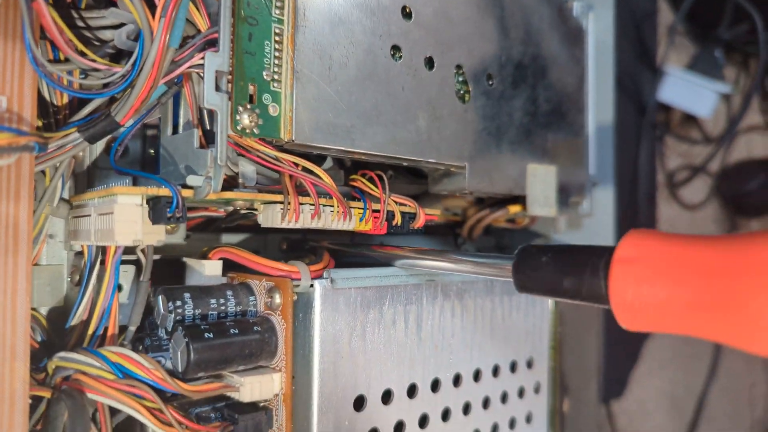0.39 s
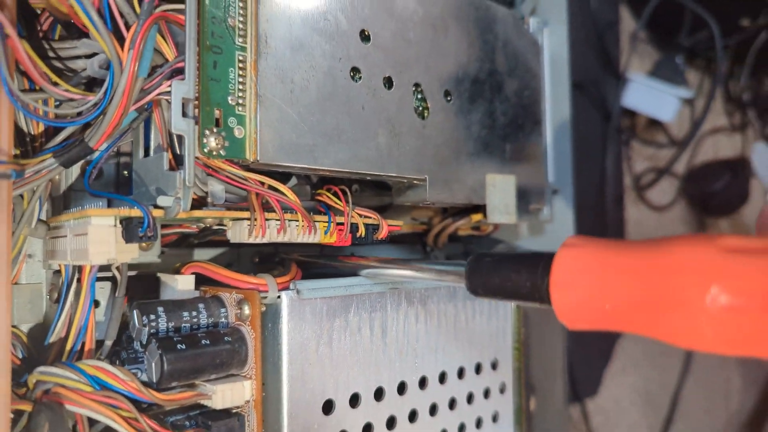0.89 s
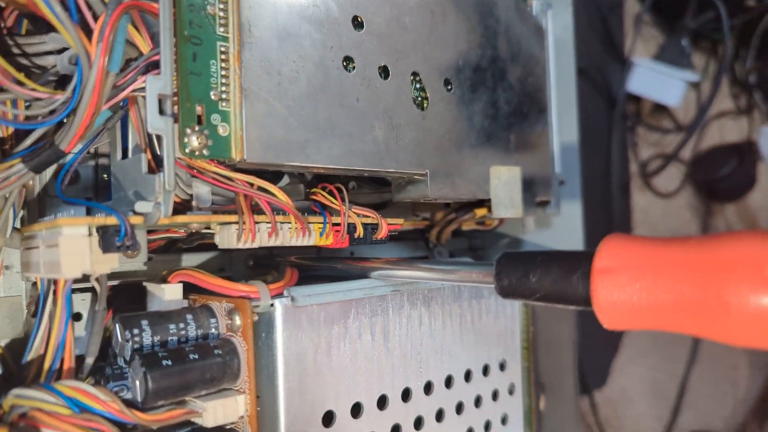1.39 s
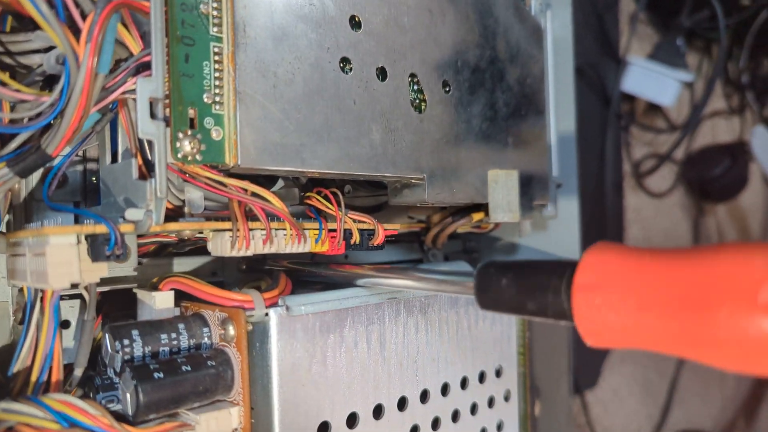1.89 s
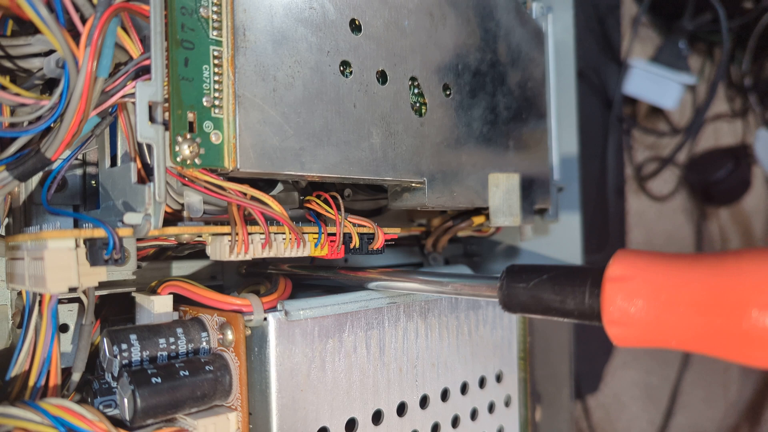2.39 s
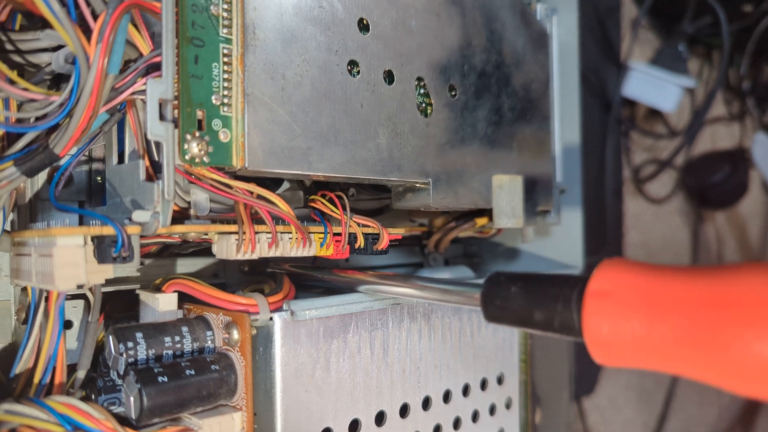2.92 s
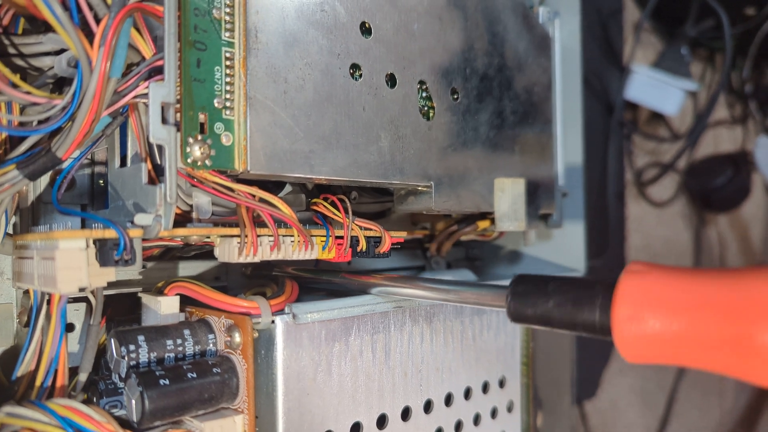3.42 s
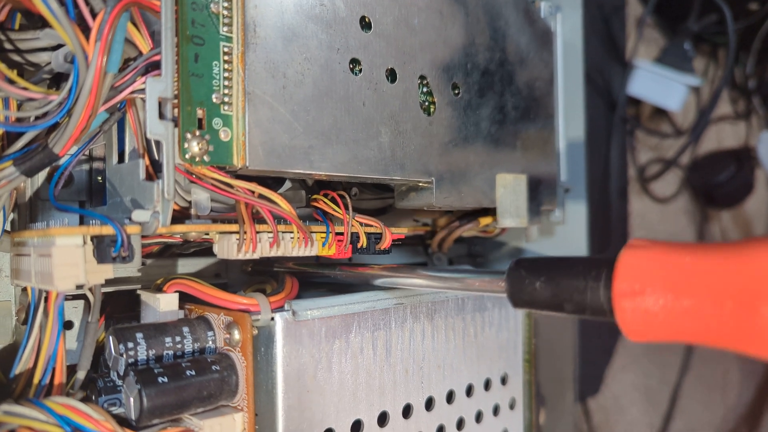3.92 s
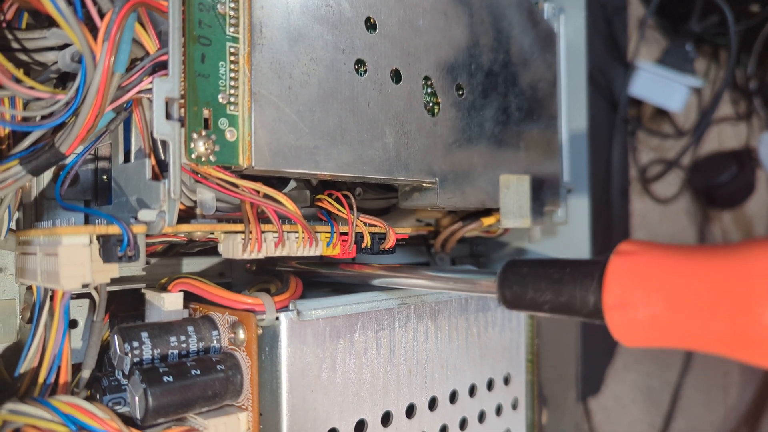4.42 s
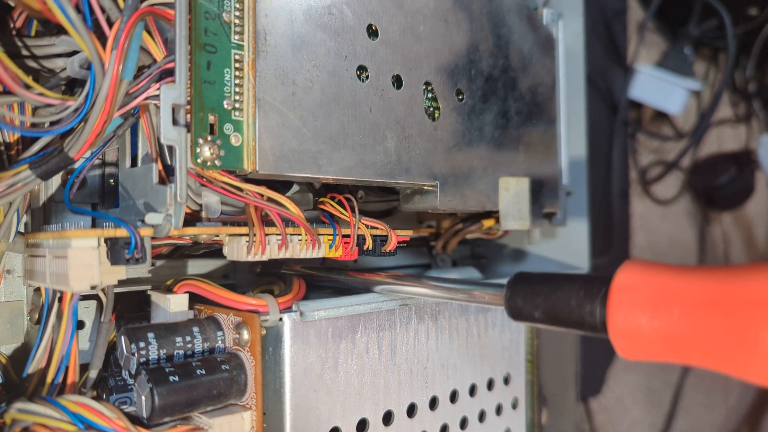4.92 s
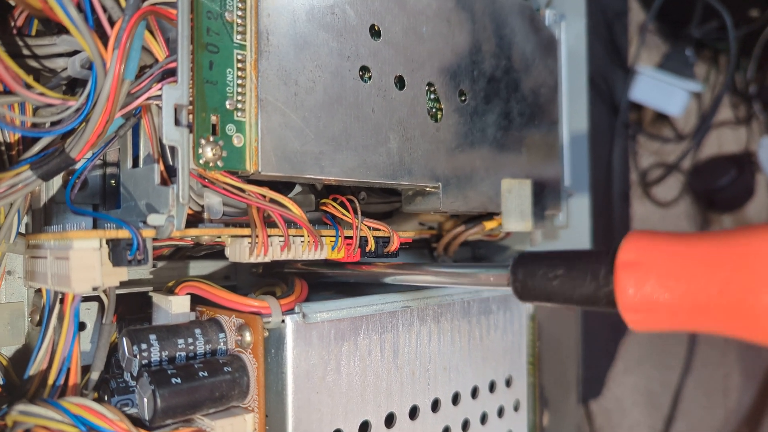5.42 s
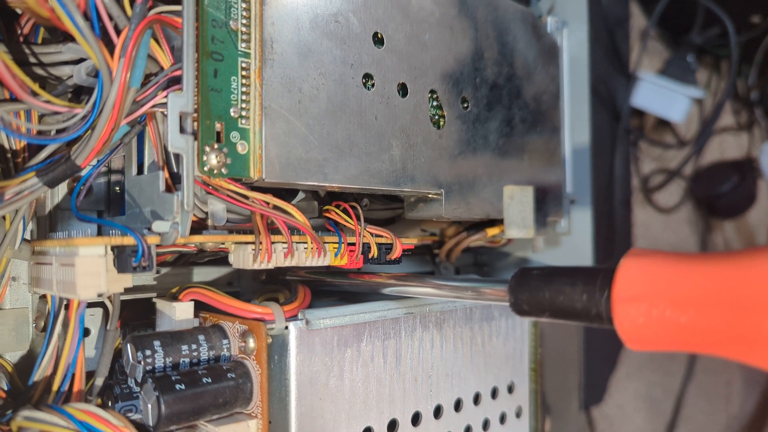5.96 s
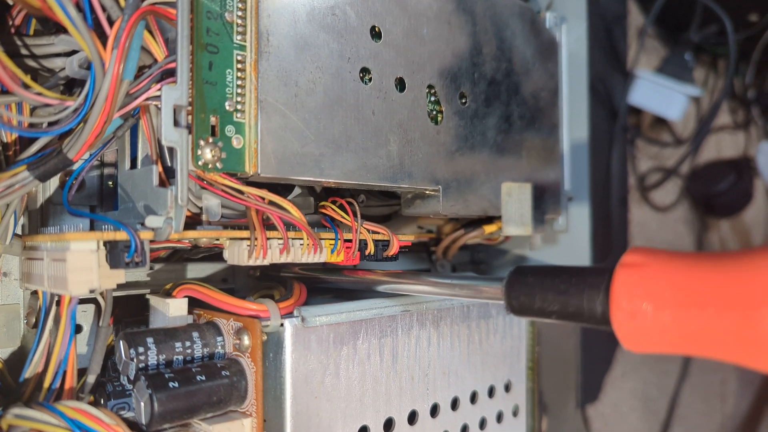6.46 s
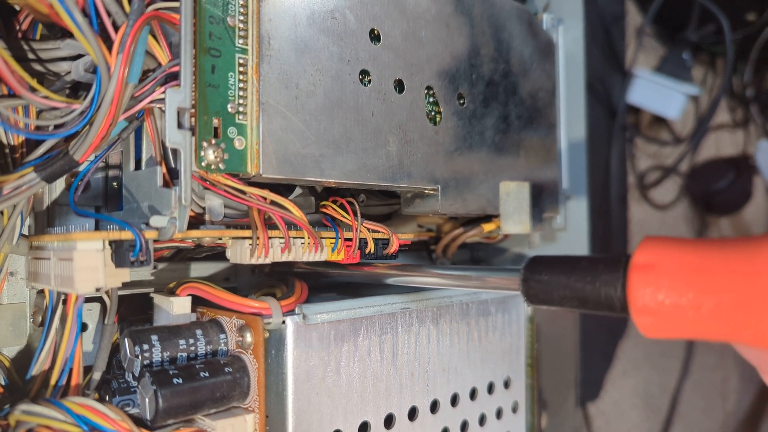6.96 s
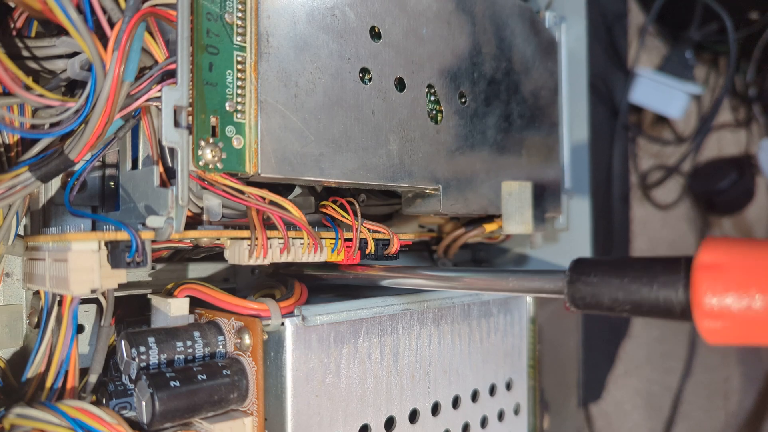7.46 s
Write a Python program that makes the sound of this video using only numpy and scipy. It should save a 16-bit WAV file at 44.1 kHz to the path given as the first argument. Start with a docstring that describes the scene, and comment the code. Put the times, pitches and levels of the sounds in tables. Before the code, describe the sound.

Sharp metallic clicks and fainter ticks ring irregularly from a thin metal chassis as a screwdriver works a screw in a quiet room.

```python
"""Ticks, sharp or faint, ring a sheet-metal chassis as a screwdriver turns out a screw in a quiet room.
The tip slips and seats in the screw head: each contact excites damped plate modes and a blurred noise tail.
Dull handle knocks and higher, short body rings under some ticks share one set of modes; soft thumps are
the chassis rocking on the bench. Near the end the shaft scrapes: stick-slip noise drives its resonances.
Filtered noises form the sliding fingers, the hand movement and the room rumble with microphone hiss."""
import sys
import numpy as np
from scipy import signal
from scipy.fft import rfft, irfft, next_fast_len
from scipy.io import wavfile
from scipy.ndimage import uniform_filter1d

SR = 44100
rng = np.random.default_rng(int(sys.argv[2]) if len(sys.argv) > 2 else 0)


def wav_record(signal):
    """Record a signal, one row per channel, as 16-bit PCM in the file named by sys.argv[1]."""
    frames = np.transpose(np.atleast_2d(signal))
    bounded = np.clip(frames, -1, 1)
    # unit amplitude maps onto the largest positive 16-bit level
    quanta = np.round(bounded * 32767).astype(np.int16)
    wavfile.write(sys.argv[1], SR, quanta)


def volts_from_decibels(level):
    """Turn decibel levels (scalar or array-like) into linear amplitude factors."""
    exponent = np.asarray(level, float) / 20
    return 10 ** exponent


N = 334719


def evened(x):
    """Normalises power: scales to rms 1."""
    return x / np.sqrt(np.mean(x ** 2) + 1e-20)


def read(points, hz):
    """Interpolates a table along log frequency, as pitch is heard."""
    f, value = np.transpose(points)
    return np.interp(np.log(hz + 1), np.log(f + 1), value)


def add(mix, s, sound):
    """Superposes a sound on the mix from a time in seconds."""
    part = mix[round(s * SR):][:len(sound)]
    part += sound[:len(part)]


def coloured(x, spectrum):
    """Linear filtering: weights the spectrum of x by a (frequency, dB) table, then sets rms 1."""
    size = next_fast_len(len(x))
    gain = volts_from_decibels(read(spectrum, np.fft.rfftfreq(size, 1 / SR)))
    return evened(irfft(rfft(x, size) * gain, size)[:len(x)])


def lumpy(rate_hz, depth_db):
    """Random amplitude modulation: a gain from rate_hz random points a second, depth_db rms."""
    points = rng.standard_normal(int(rate_hz * N / SR))
    return volts_from_decibels(depth_db * evened(signal.resample(points, N)))


def ticks():
    """Superposition of contacts: sharp metallic blows, faint dull nudges and soft rustly touches."""
    # ticks of the tip, from sharp metallic blows to faint dull nudges and soft rustly contacts:
    # (time [s], peak of the middle ring before its rise [dB], treble rings above that peak [dB],
    # bass rings above it [dB], tilt of the middle [dB per octave])
    contacts = [(0.124, -56.5, -31, -6, -2), (0.207, -57, -21.5, 2.5, -8), (0.2805, -31.5, -24, -24, 3),
                (0.3683, -32, -27.5, -24.5, 1), (0.4278, -37, -24, -23, 0), (0.635, -14, -22, -24.5, 2),
                (0.8429, -33, -26, -23, 0), (0.925, -54, -16.5, -1, 4), (0.9996, -18, -22, -28, 1.5),
                (1.1442, -48.5, -26, -15, 23), (1.157, -44.5, -34, -8.5, -22), (1.168, -51, -38, -4, -12),
                (1.3811, -24.5, -33, -22.5, 0), (1.6001, -12, -28.5, -21, 22.5),
                (1.775, -23.5, -27, -26, 3), (1.8522, -54, -22, -1, 2), (1.8993, -31.5, -23, -25, 4),
                (2.0139, -54.5, -46, -5, -15), (2.0735, -22.5, -22, -25, 1),
                (2.1903, -40.5, -16.5, -9.5, 35), (2.395, -54, -28, 1, -7), (2.5253, -34, -29.5, -18.5, 7),
                (2.5713, -38, -25.5, -13, -9), (2.8939, -36.5, -26.5, -24, -4),
                (3.1722, -11, -21, -27.5, 1.5), (3.2363, -43.5, -27, -6, -10), (3.3313, -56, -18, -7, -2),
                (3.3628, -55.5, -27, -8, -7), (3.418, -49, -29, -33, -5), (3.472, -13.5, -20, -29.5, -0.5),
                (3.566, -54, -31, -0.5, 21), (3.7683, -14.5, -20, -26.5, -2.5),
                (4.2011, -44, -31, -6.5, -12), (4.373, -37, -26.5, -18, -14),
                (4.9503, -11, -20.5, -29.5, -1.5), (5.023, -41, -20.5, -11, 0), (5.0646, -62, -24, 0, 2),
                (5.249, -54.5, -14.5, -9, 10), (5.9195, -54.5, -20, -2, -6), (6.128, -14.5, -21, -30, -2.5),
                (6.1494, -28, -29, -12, 4), (6.169, -24, -21.5, -17, -7), (7.2881, -54.5, -27.5, -14, 1)]
    out = np.zeros(N)
    for s, *contact in contacts:
        add(out, s, tick(*contact, tail_db=-6.5))
    return np.roll(out, -35)  # samples: the times mark the steep part of the rise


def tick(db, treble_db, bass_db, tilt_db, tail_db):
    """Modal synthesis: one contact rings bass, middle and treble modes, varied by where the tip lands."""
    # what the chassis rings with: (frequency [Hz], relative level [dB], t60 before damping [s])
    chassis = [(286.4, -16, 0.13), (447.6, -7, 0.032), (654.5, -7, 0.11), (709.6, -11.5, 0.11),
               (853, -5, 0.058), (983, -10.5, 0.056), (1122, -11, .055), (1227, -11, .055), (1375, -3, .05),
               (1620, -9, .02), (1863, -2, .06), (2105, -4, .035), (2400, -6, .035), (2720, -14, .03),
               (3440, 7, 0.0147), (3580, -13.5, 0.0095), (4300, 1, 0.022), (4778, 4.5, 0.027),
               (4950, 1, 0.029), (5705, -9, 0.042), (5890, -19, 0.023), (6546, 4, 0.025),
               (7050, -7.5, 0.0067), (7860, -8, 0.096), (8500, -1.5, 0.04), (10880, 8, 0.014),
               (13200, 4.5, 0.0098), (15000, 2, .006)]
    # dense clatter of high plate modes, too many to list: (frequency [Hz], relative density [dB per Hz])
    clatter_colour = [(1470, -16.5), (2500, -8.5), (2950, -14), (3400, 3), (3920, -5.5), (5770, -5.5),
                      (14300, -17.5), (15900, -18.5), (16500, -50.5)]
    bass_top_hz, treble_foot_hz = 1050, 3050
    ping_hz = 1863  # the mode that light, thin ticks single out
    hz, mode_db, t60 = np.transpose(chassis)[:, :, None]
    t = np.arange(6000) / SR

    # harder, thinner blows have a brighter top: dB per octave above 5 kHz
    sharp_db = 0.35 * (db + 22) + 0.9 * (treble_db + 19.5)
    length = np.clip(0.7 - 0.012 * (db + 25.5), 0.4, 1.2)  # a firmly seated tip damps the ring

    lean_db = tilt_db * np.log2(np.clip(hz, bass_top_hz, treble_foot_hz) / 1800)
    lightness_db = np.clip(-0.35 * (db + 18), 0, 7)
    thinness = np.clip(-(bass_db + 8) / 10, 0, 1)
    ping_db = lightness_db * thinness * (abs(hz - ping_hz) < 50)
    top_db = sharp_db * np.log2(np.maximum(hz / 5000, 1))

    detune, shift, unevenness = rng.standard_normal((3, len(chassis), 1))
    phase = 2 * np.pi * hz * (1 + 0.003 * detune) * t + 0.6 * shift
    level_db = mode_db + lean_db + ping_db + 0.79 * unevenness + top_db
    rings = volts_from_decibels(level_db - 60 * t / (t60 * length)) * np.sin(phase)

    bass, treble = hz[:, 0] < bass_top_hz, hz[:, 0] > treble_foot_hz
    low, middle, high = (rings[part].sum(0) for part in (bass, ~bass & ~treble, treble))
    colour = [(f, g + sharp_db * np.log2(max(f / 5000, 1))) for f, g in clatter_colour]
    clatter = coloured(rng.standard_normal(len(t)), colour) * volts_from_decibels(-60 * t / (0.033 * length))

    first = slice(0, 440)  # bass, treble and clatter are levelled over the first 10 ms
    high = high / high[first].std() + volts_from_decibels(0.5) * clatter / clatter[first].std()
    sound = middle / abs(middle).max() + volts_from_decibels(treble_db) * high + volts_from_decibels(bass_db) * low / low[first].std()
    rise = (1 - np.exp(-t / 0.00056)) ** 2  # the contact builds up over a millisecond
    return struck(volts_from_decibels(db) * rise * sound, tail_db)


def struck(sound, tail_db):
    """Reverberation of a contact: its tail keeps the colour of the sound with the pitches blurred."""
    power = uniform_filter1d(abs(rfft(sound, 4096)) ** 2, size=45, mode="mirror")
    feed = np.roll(irfft(np.sqrt(power)), 100)[:200] * np.hanning(200)  # a pulse centred at sample 100
    feed = feed * np.linalg.norm(sound) / np.linalg.norm(feed)
    out = tail(feed, tail_db)[100:]
    add(out, 0, sound)
    return out


def tail(feed, tail_db):
    """Diffuse decay by convolution: noise builds up in milliseconds, dies band by band, is soon swallowed."""
    # the tail that cabinet and room add: (frequency [Hz], t60 before the late fade [s])
    decay_times = [(200, 0.27), (700, 0.29), (1800, 0.11), (5000, 0.14), (13000, 0.17)]
    hz, t, z = signal.stft(rng.standard_normal(SR // 5), SR, nperseg=128)
    late_fade_db = 9 * (t / 0.11) ** 4
    fall_db = -60 * t / read(decay_times, hz)[:, None] - late_fade_db
    decay = signal.istft(z * volts_from_decibels(fall_db), SR, nperseg=128)[1]
    decay = decay * (1 - np.exp(-np.arange(len(decay)) / SR / 0.0019))
    return signal.fftconvolve(feed, volts_from_decibels(tail_db) * decay / np.linalg.norm(decay))


def knocks():
    """Modal impact: one set of modes, scaled in pitch, rings briefly after a burst of bright noise."""
    # dull handle knocks, and higher-pitched short body rings under some ticks:
    # (time [s], peak of the ring [dB], pitch factor, tail level [dB])
    events = [(1.600, -29, 1.9, -7), (3.134, -34, 0.92, -29), (3.161, -50, 0.85, -20),
              (4.3286, -19.5, 0.977, -26), (6.149, -38, 1.33, -6), (6.169, -36.5, 1.35, -12)]
    # modes of the plastic handle: (frequency before the pitch factor [Hz], relative level [dB], t60 [s])
    handle = [(500, -5, 0.03), (649, 8.5, 0.018), (973, -3, 0.027), (1061, -17, 0.053),
              (1620, -19.5, 0.047), (2140, -25, 0.07), (4370, -21.5, 0.015), (5100, -16, 0.013)]
    out, t = np.zeros(N), np.arange(4000) / SR
    hz, mode_db, t60 = np.transpose(handle)[:, :, None]
    for s, db, pitch, tail_db in events:
        ring = (volts_from_decibels(mode_db - 60 * t / t60) * np.sin(2 * np.pi * hz * pitch * t)).sum(0)
        ring = ring * (1 - np.exp(-t / 0.00057))
        crack = signal.lfilter(*signal.butter(2, 3500, "high", fs=SR), rng.standard_normal(len(t)))
        crack = crack * volts_from_decibels(-29.5 - 60 * t / 0.02)
        add(out, s, struck(volts_from_decibels(db) * (ring / abs(ring).max() + crack), tail_db))
    return out


def thumps():
    """Damped oscillation: the chassis rocks for a few soft low cycles."""
    # the whole chassis rocks on the bench after a firm push: (time [s], peak [dB], frequency [Hz])
    pushes = [(0.217, -55.5, 51), (0.638, -45, 98), (0.999, -50, 78.1), (1.601, -47, 129),
              (1.602, -49, 220), (1.79, -52, 63.6), (2.19, -56, 253), (2.5, -50.5, 82), (3.178, -42.5, 93),
              (3.206, -48, 53.8), (3.47, -43.5, 92), (3.775, -49, 104), (4.078, -47.5, 70),
              (4.961, -55, 50.7), (5.261, -47.5, 71), (5.55, -50.5, 67.3), (6.15, -52.5, 235)]
    out, t = np.zeros(N), np.arange(SR // 4) / SR
    envelope = (1 - np.exp(-t / 0.0048)) * volts_from_decibels(-60 * t / 0.15)  # t60 0.15 s
    for s, db, hz in pushes:
        push = np.sin(2 * np.pi * hz * t) * envelope
        add(out, s, volts_from_decibels(db) * push / abs(push).max())
    return out


def scrape():
    """Stick-slip excitation: dense tiny slips and a few catches drive the shaft's resonances."""
    # the shaft drags over metal: (time [s], level of the driving slips [dB])
    drag = [(7.01, -85), (7.019, -59), (7.035, -56.5), (7.054, -47.5), (7.07, -61), (7.082, -54.5),
            (7.105, -81)]
    # where it catches on an edge: (time [s], envelope peak of the driving noise [dB])
    catches = [(7.0154, -66), (7.0229, -53), (7.0411, -41), (7.0524, -45), (7.0577, -40), (7.0638, -45),
               (7.0804, -53.5)]
    # resonances of the shaft: (frequency [Hz], bandwidth [Hz], relative level [dB])
    shaft = [(2220, 30, 1), (2800, 140, -8), (3630, 150, -5), (5340, 280, -2), (6120, 300, -13),
             (6800, 480, -5), (8600, 2400, -20), (10500, 1600, -11.5), (14600, 1600, -22)]
    s, db = np.transpose(drag)
    t = np.arange(s[0], s[-1], 1 / SR)
    slips = rng.standard_normal(len(t)) * volts_from_decibels(2.5 * rng.exponential(1, len(t)))
    drive = np.zeros(N)
    add(drive, s[0], evened(slips) * volts_from_decibels(np.interp(t, s, db)))
    u = np.arange(800) / SR
    burst = u / 0.0012 * np.exp(1 - u / 0.0012)  # peaks at 1.2 ms
    for at, peak_db in catches:
        add(drive, at, volts_from_decibels(peak_db) * rng.standard_normal(len(u)) * burst)

    body = sum(volts_from_decibels(g) * w * np.exp(-np.pi * w * u) * np.sin(2 * np.pi * f * u) for f, w, g in shaft)
    # a very short pulse passes broad friction noise beside the resonances
    rasp = 2 * volts_from_decibels(-11.5) * np.exp(-u / 0.00003) * (u < 0.0005)
    body = body / np.linalg.norm(body) + rasp
    body = signal.lfilter(*signal.butter(2, 1500, "high", fs=SR), body)  # a thin shaft radiates no bass
    out = signal.oaconvolve(drive, body / np.linalg.norm(body))[:N]
    return out + tail(out, tail_db=-21)[:N]


def rub():
    """Sliding friction as modulated noise: fingers pass over the grip with a faint grainy hiss."""
    # fingers slide on the grip: (time of the peak [s], peak level [dB], rise [dB per s], fall [dB per s])
    slides = [(1.16, -80, 400, 170), (6.87, -77, 44, 300)]
    # spectrum of the hiss: (frequency [Hz], relative density [dB per Hz])
    colour = [(500, -44), (1500, -1), (3000, -8), (7000, -4), (12000, -12), (16000, -13)]
    t = np.arange(N) / SR
    level = np.zeros(N)
    for s, db, rise_db, fall_db in slides:
        level += volts_from_decibels(db - np.maximum(rise_db * (s - t), fall_db * (t - s)))
    grains = rng.standard_normal(N) * lumpy(150, depth_db=2.5)
    return coloured(grains, colour) * level


def hands():
    """Friction noise in two bands: low bumps and a soft rustle, both lumpy, rise as the grip shifts."""
    # hands work the tool: (time [s], level of the rustle [dB])
    movement = [(0.0, -73.5), (0.36, -74), (0.7, -67), (1.08, -72), (1.22, -62), (1.31, -70), (1.69, -67.5),
                (1.88, -77), (2.05, -65), (2.56, -74), (3.3, -66), (3.6, -74.5), (3.95, -69.5),
                (5.05, -71.5), (6.55, -73), (6.79, -68), (7.27, -74.5), (7.59, -74)]
    # spectra of bumps and rustle: (frequency [Hz], relative density [dB per Hz])
    bump_colour = [(30, -25), (60, -0.5), (110, -1), (200, -8.5), (400, -22), (800, -50.5)]
    rustle_colour = [(150, -29), (350, -1), (700, -5), (1200, -12.5), (2500, -18), (6000, -29),
                     (16000, -33.5)]
    t = np.arange(N) / SR
    rustle_db = np.interp(t, *np.transpose(movement))
    # the bumps partly follow the rustle and ease by 0.67 dB per second as the screw loosens
    bump_db = -60.5 + 0.19 * (rustle_db + 70) - 0.67 * t
    bumps = coloured(rng.standard_normal(N) * lumpy(25, depth_db=2.0), bump_colour)
    rustle = coloured(rng.standard_normal(N) * lumpy(60, depth_db=2.5), rustle_colour)
    return bumps * volts_from_decibels(bump_db) + rustle * volts_from_decibels(rustle_db)


def floor():
    """Stationary noise shaped by a spectrum: room rumble and microphone hiss, wandering slowly."""
    # spectrum of the background: (frequency [Hz], relative density [dB per Hz])
    colour = [(28, -59), (38, -0.5), (49, 4), (70, -16), (125, -11), (155, -6), (200, -16), (300, -14.5),
              (600, -23.5), (900, -34), (1600, -35), (2200, -26.5), (2700, -35), (3600, -51), (6500, -39.5),
              (12500, -48.5), (15800, -50), (16800, -72)]
    noise = coloured(rng.standard_normal(N), colour)
    return volts_from_decibels(-65) * noise * lumpy(2.7, depth_db=1.0)


def scene():
    """Superposition: tool and chassis over hands and floor, in one channel."""
    mix = ticks() + knocks() + thumps() + scrape() + rub() + hands() + floor()
    return mix[None]


def band_limit(x):
    """A steep low-pass at the top of the band."""
    return signal.sosfilt(signal.butter(12, 16820, fs=SR, output="sos"), x)


def record(dry):
    """Signal chain: the finished mix passes through a steep low-pass at the top of the band, with no further
    gain."""
    return band_limit(dry)


dry = scene()
out = record(dry)
wav_record(out)
```